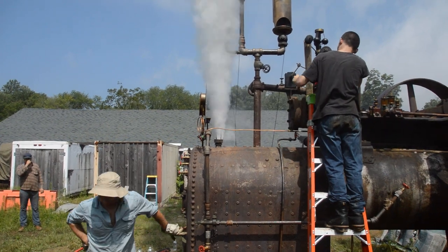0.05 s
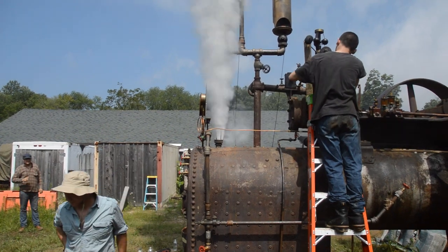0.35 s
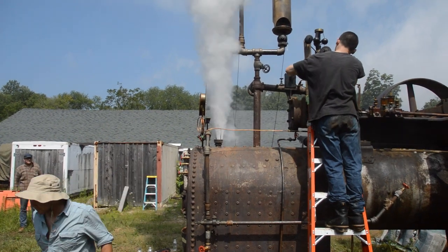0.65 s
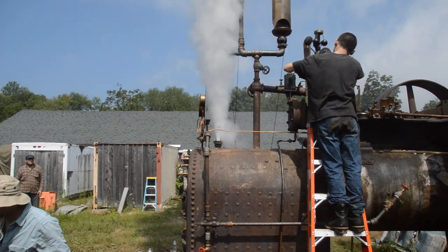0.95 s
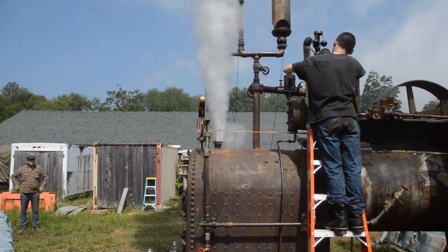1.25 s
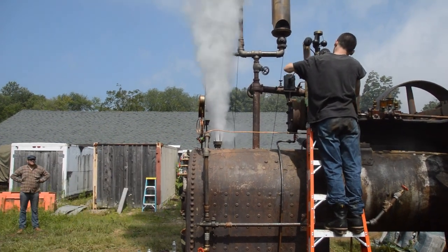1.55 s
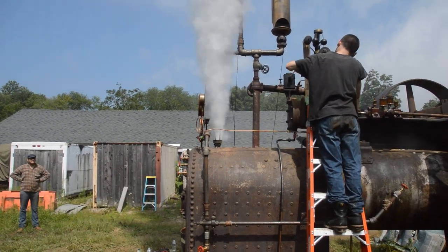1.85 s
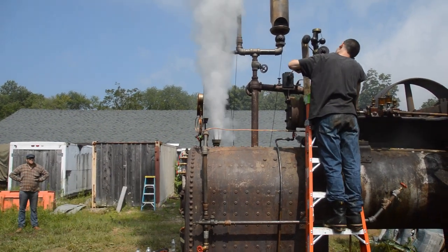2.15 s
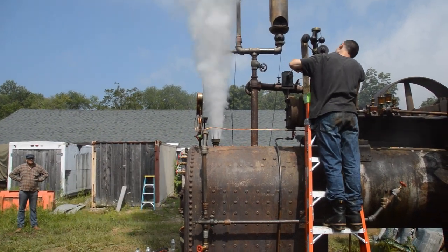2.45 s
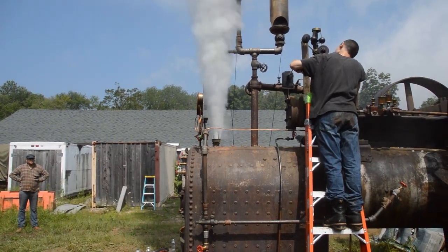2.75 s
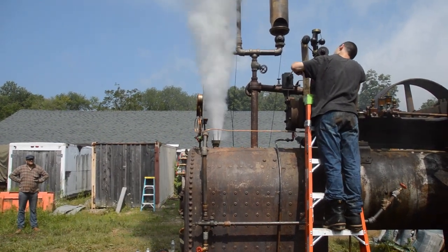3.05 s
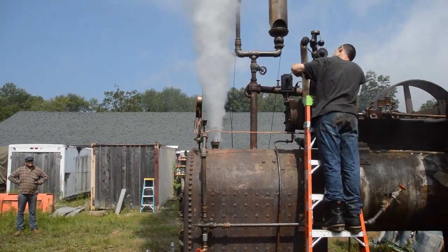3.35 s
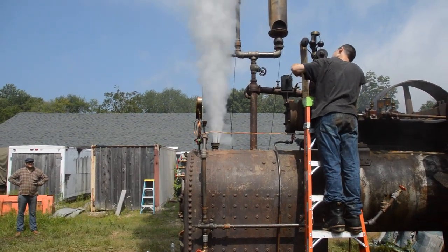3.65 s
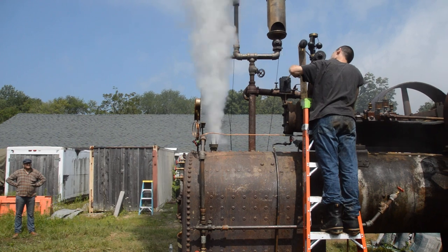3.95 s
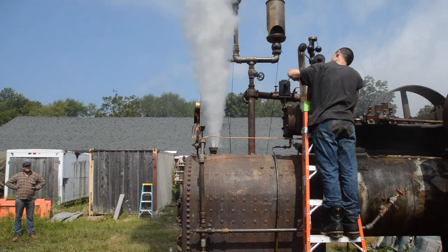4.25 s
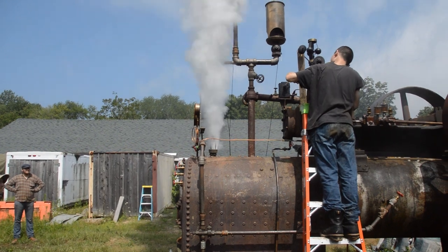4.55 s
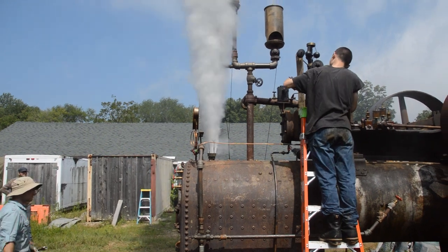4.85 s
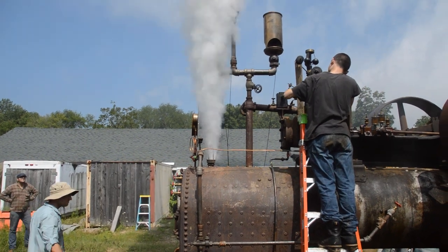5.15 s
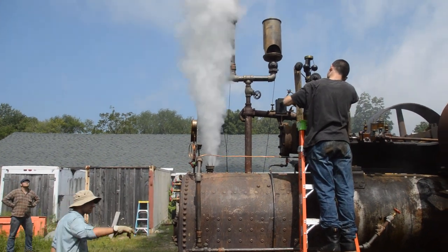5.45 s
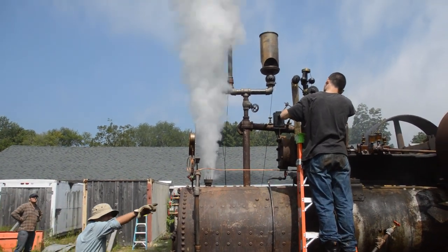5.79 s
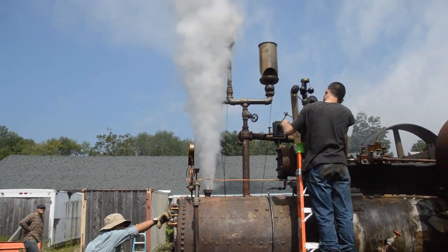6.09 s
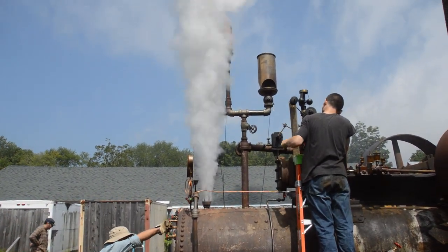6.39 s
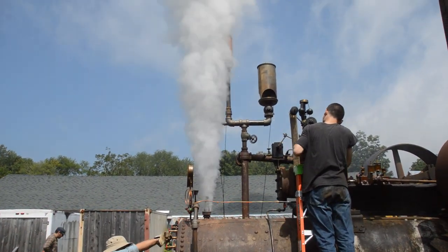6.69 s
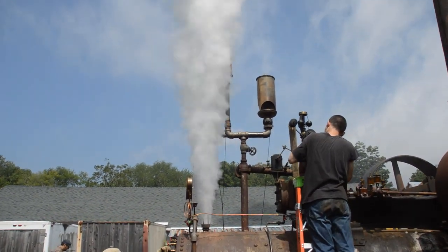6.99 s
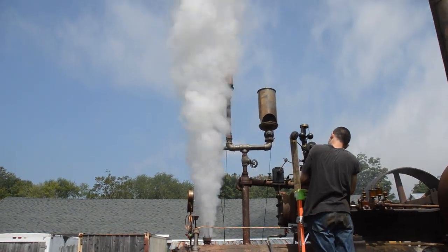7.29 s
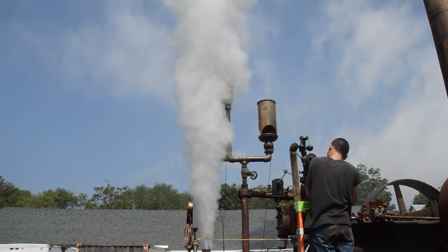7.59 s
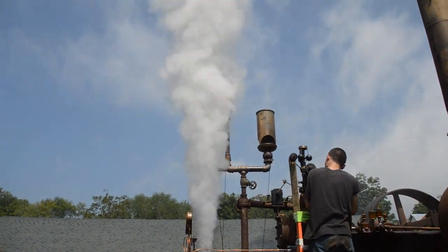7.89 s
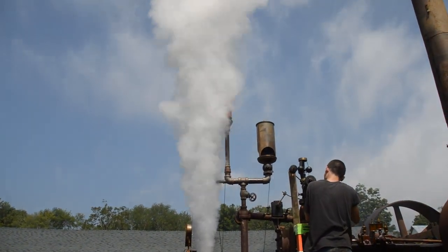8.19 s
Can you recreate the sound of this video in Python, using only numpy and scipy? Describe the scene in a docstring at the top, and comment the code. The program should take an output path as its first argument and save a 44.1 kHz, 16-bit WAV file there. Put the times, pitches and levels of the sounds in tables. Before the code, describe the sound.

Steam hisses loudly and steadily from a boiler pipe outdoors, surging slightly over a soft roar.

```python
"""Steam blows steadily from a pipe on top of a steam engine's boiler, outdoors, a few metres away.
From the start the nozzle hisses in quick surges and spits faint, fine droplets, while the plume
above it roars over a low rumble that slowly settles. From about 5 s the microphone tilts up:
the hiss turns a little lower in colour, and a weak reflection sweeps along with it."""
import sys
import numpy as np
from scipy import signal
from scipy.fft import rfft, irfft, next_fast_len
from scipy.io import wavfile
from scipy.ndimage import uniform_filter1d, map_coordinates

SR = 44100
rng = np.random.default_rng(int(sys.argv[2]) if len(sys.argv) > 2 else 0)


def to_wav(s):
    """Save 16-bit WAV."""
    ch = np.atleast_2d(s).T  # columns
    pcm = np.round(np.clip(ch, -1, 1) * 32767)  # PCM
    wavfile.write(sys.argv[1], SR, pcm.astype(np.int16))


N = 367350

# the microphone's aim: (time [s], upward tilt [0-1])
MIC_TILT = [(0, 0), (4.8, 0.03), (6.2, 0.49), (7.5, 0.86), (8.33, 0.99)]
# hiss colour, microphone level and raised: (frequency [Hz], relative level [dB])
HISS_EQ_LEVEL = [(3600, -26.5), (4900, -11.5), (6350, -7), (7300, -7.5), (8200, -2.5), (9000, -0.1),
                 (9550, -0.5), (9850, 0.3), (10150, 1.7), (10420, 0.5), (10800, -1.5), (11500, -6),
                 (12950, -7), (14000, -11), (15700, -14)]
HISS_EQ_RAISED = [(3600, -37), (4900, -11), (6000, -10.5), (6850, -5), (7350, -6), (7950, -2), (8450, -2.5),
                  (9100, 1), (10100, -4), (11100, -4), (12200, -11.5), (13400, -15), (14400, -13),
                  (15700, -21)]
# the valve passes more steam for a moment: (time [s], lift [dB], length [s])
VALVE_SURGES = [(0.01, 2.5, 0.1), (0.58, 2, 0.086), (0.71, 1.5, 0.091), (1.03, 3, 0.083), (1.19, 2.5, 0.08),
                (1.58, 1.4, 0.39), (1.88, 2.2, 0.2), (2.34, 1.9, 0.23), (2.94, 2, 0.35), (3.24, 2.5, 0.15),
                (3.5, 3, 0.19), (3.88, 2.5, 0.36), (4.37, 1.5, 0.16), (4.65, 1.3, 0.15), (5.06, 1.6, 0.16),
                (5.19, 1.7, 0.19), (5.93, 2.4, 0.13), (6.58, 2.5, 0.19), (7.39, 1.8, 0.29), (7.63, 2, 0.16)]
# the jet falters for a moment: (time [s], drop [dB], length [s])
JET_SAGS = [(0.38, 1.6, 0.19), (0.87, 3, 0.16), (1.71, 2.4, 0.15), (2.14, 1.3, 0.21), (2.82, 3.5, 0.043),
            (3.1, 1.8, 0.15), (3.74, 2.4, 0.22), (4.95, 2.3, 0.2), (5.77, 3.5, 0.091), (6.39, 1.5, 0.16),
            (6.74, 1.5, 0.15), (7.18, 3, 0.11), (7.46, 3, 0.14)]
# roar colour, microphone level and raised: (frequency [Hz], relative level [dB])
ROAR_EQ_LEVEL = [(380, -33), (520, -8), (700, -7), (980, -5.5), (1200, -3.5), (1460, -1), (1800, -3),
                 (2080, -2), (2700, -4), (3500, -3), (4000, -5.5), (4600, -5.5), (6000, -9.5)]
ROAR_EQ_RAISED = [(380, -21), (520, -8.5), (700, -5), (980, -4.5), (1200, -1), (1460, 0.3), (1950, -0.9),
                  (2450, 2.3), (2750, -3.5), (3100, 0.5), (4000, -0.5), (4600, -3), (6000, -25)]
# the plume's slow drift under the surges: (time [s], level [dB])
ROAR_FADER = [(0, -22.5), (.6, -23), (.85, -24.5), (2, -24.5), (3.7, -25.5), (5.3, -24.7), (7.1, -24.5),
              (7.3, -23.5), (7.6, -25.5), (8.33, -24)]
# the plume's low end: (frequency [Hz], relative level [dB])
RUMBLE_EQ = [(15, -34), (30, -27), (50, -21.5), (90, -13), (130, -7), (205, -1.5), (240, -3), (345, 1),
             (420, -1), (520, -2.5), (800, -46)]
# the vent pipe's hollow tones and one dip: (frequency [Hz], width [Hz], gain [dB])
PIPE_TONES = [(335, 60, 1.5), (422, 49, -3), (676, 79, 2.6), (1480, 390, 1.3), (2030, 89, 0.6),
              (3060, 110, 1.5), (3590, 87, 2)]
# a droplet bursting in the jet: (frequency [Hz], relative level [dB])
DROPLET_EQ = [(300, -35), (1500, -5), (5000, 3), (9500, -4), (15700, -4)]

HISS_DB = -13  # at steady flow


def nozzle(surge_db, flutter_db, flutter_rate, skirt_hz, skirt_calm):
    """Fine turbulence at the mouth: a bright, broad hiss that flutters on top of each surge."""
    level = turbulence(HISS_EQ_LEVEL, patchy_db=0.65)
    raised = turbulence(HISS_EQ_RAISED, patchy_db=0.3)
    hiss = tilt_crossfade(level, raised)
    # the lower skirt comes from further up the jet, where the surges have partly evened out
    skirt = filtered(hiss, lambda hz: 1 / (1 + (hz / skirt_hz) ** 10))
    hiss = hiss - skirt + skirt * amp(-skirt_calm * surge_db)
    return hiss * amp(HISS_DB + surge_db + flutter_db * wobble(flutter_rate))


def plume(surge_db, surge_share, churn_db, churn_rate):
    """The jet widens into larger, slower eddies: a roar that rides part of each surge."""
    level = turbulence(ROAR_EQ_LEVEL, patchy_db=0.5)
    raised = turbulence(ROAR_EQ_RAISED, patchy_db=0.93)
    roar_db = curve(ROAR_FADER) + surge_share * surge_db + churn_db * wobble(churn_rate)
    return tilt_crossfade(level, raised) * amp(roar_db)


def plume_rumble(settled_db, extra_db, settle_s):
    """The weight under the roar: it starts full and settles."""
    settling = np.exp(-np.arange(N) / SR / settle_s)
    return turbulence(RUMBLE_EQ, patchy_db=1.1) * amp(settled_db + extra_db * settling)


def pipe_resonance(hz):
    """The pipe's hollow ring as a gain: broad peaks, with a dip between the lowest two."""
    return amp(sum(db / (1 + (2 * (hz - centre) / width) ** 2) for centre, width, db in PIPE_TONES))


def droplets(surge_db, per_second, below_hiss_db):
    """Condensate torn off the lip: tiny snaps of uneven size that follow the flow."""
    sizes = 2 * rng.random(N) - 1
    snaps = (rng.random(N) < per_second / SR) * sizes
    return coloured(snaps, DROPLET_EQ) * amp(HISS_DB + surge_db - below_hiss_db)


def reflection(steam, level_lag_ms, raised_lag_ms, gain_db, dull_hz):
    """A dull bounce off a nearby surface; its lag shortens with the tilt, which sweeps the colour."""
    lag_ms = level_lag_ms + (raised_lag_ms - level_lag_ms) * curve(MIC_TILT)
    dull = filtered(steam, lambda hz: 1 / (1 + (hz / dull_hz) ** 4))
    return amp(gain_db) * map_coordinates(dull, [np.arange(N) - lag_ms * SR / 1000])


def turbulence(spectrum, patchy_db):
    """Noise of rms 1 in which passing eddies lift and drop patches of the spectrum."""
    bins = signal.stft(rng.standard_normal(N), nperseg=512)[2]
    eddies = rng.standard_normal(bins.shape)
    for axis in (0, 1):  # smear across frequency, then time
        eddies = uniform_filter1d(eddies, size=12, axis=axis)
    noise = signal.istft(bins * amp(patchy_db * unit(eddies)), nperseg=512)[1]
    return coloured(noise[:N], spectrum)


def tilt_crossfade(level, raised):
    """An equal-power fade from one colour to the other as the microphone tilts up."""
    tilt = curve(MIC_TILT)
    return np.sqrt(1 - tilt) * level + np.sqrt(tilt) * raised


def swells(rows):
    """A ride in dB: each row ramps up to its peak at its time and back down as fast."""
    t = np.arange(N) / SR
    return sum(db * np.clip(1 - 2 * np.abs(t - peak_s) / length, 0, 1) for peak_s, db, length in rows)


def coloured(x, spectrum):
    """x through an EQ curve that rolls off beyond its ends, brought to rms 1."""
    points_hz, db = np.transpose(spectrum)

    def eq(hz):
        low_cut = np.minimum((hz / points_hz[0]) ** 2, 1)
        high_cut = np.minimum((points_hz[-1] / (hz + 1)) ** 2, 1)
        return low_cut * high_cut * amp(np.interp(np.log(hz + 1), np.log(points_hz), db))
    return unit(filtered(x, eq))


def filtered(x, response):
    """x shaped by a gain for each frequency."""
    size = next_fast_len(N + SR // 2)
    hz = np.fft.rfftfreq(size, 1 / SR)
    return irfft(rfft(x, size) * response(hz), size)[..., :N]


def wobble(rate):
    """A smooth random curve, rate knots a second."""
    knots = rng.standard_normal(4096)
    return map_coordinates(knots, [np.arange(N) * rate / SR], mode="wrap")


def curve(rows):
    """Automation points to one value per sample."""
    return np.interp(np.arange(N) / SR, *np.transpose(rows))


def amp(db):
    """Decibels to gain."""
    return 10 ** (np.asarray(db) / 20)


def unit(x):
    """x at rms 1."""
    return x / np.sqrt(np.mean(x ** 2) + 1e-20)


def scene():
    """One flow drives hiss, roar and droplets: a compact source, dead centre."""
    surge_db = swells(VALVE_SURGES) - swells(JET_SAGS)
    hiss = nozzle(surge_db, flutter_db=0.57, flutter_rate=75, skirt_hz=6960, skirt_calm=0.25)
    roar = plume(surge_db, surge_share=0.35, churn_db=0.03, churn_rate=17)
    rumble = plume_rumble(settled_db=-46, extra_db=4.5, settle_s=5)
    body = filtered(roar + rumble, pipe_resonance)
    steam = hiss + body + droplets(surge_db, per_second=12, below_hiss_db=25)
    mix = steam + reflection(steam, level_lag_ms=1.436, raised_lag_ms=1.25, gain_db=-21, dull_hz=7500)
    return np.array([mix, mix])


def record(dry):
    """A brick-wall high cut takes the top air off the mix."""
    return filtered(dry, lambda hz: hz < 15750)


dry = scene()
out = record(dry)
to_wav(out)
```